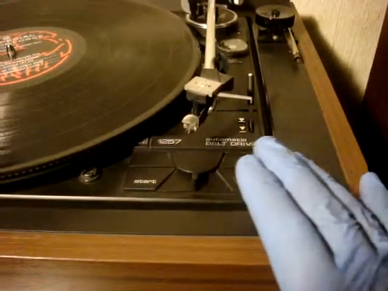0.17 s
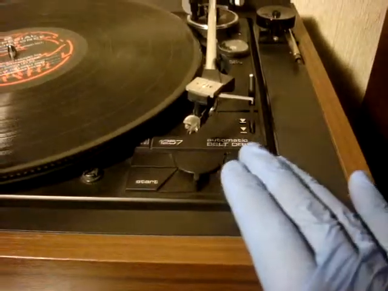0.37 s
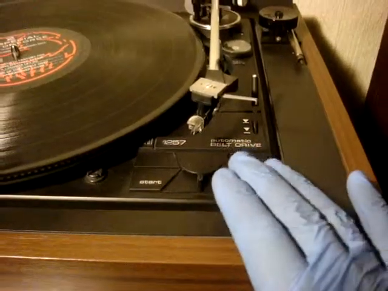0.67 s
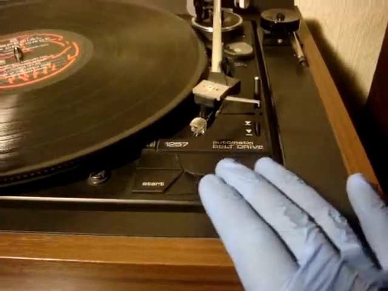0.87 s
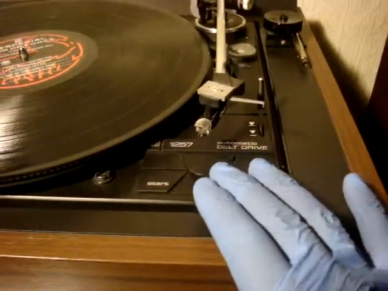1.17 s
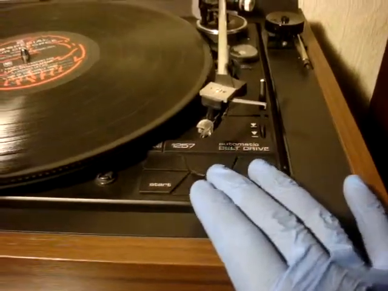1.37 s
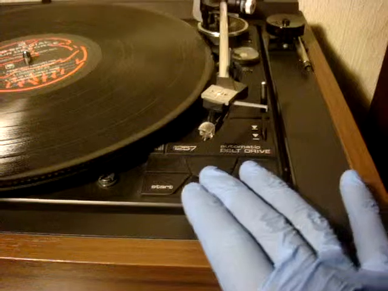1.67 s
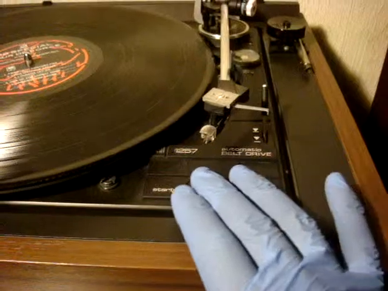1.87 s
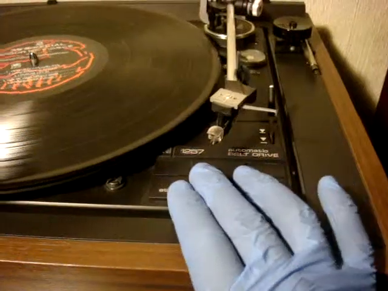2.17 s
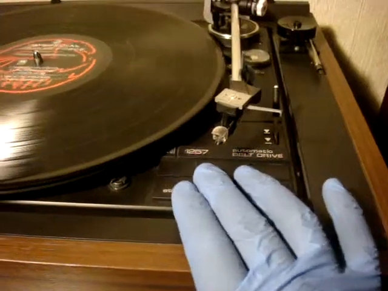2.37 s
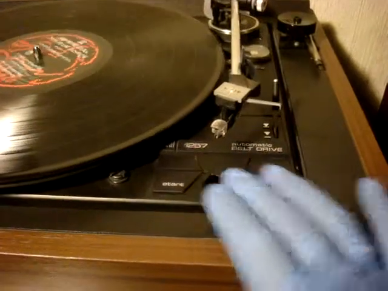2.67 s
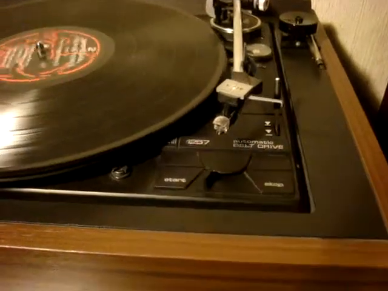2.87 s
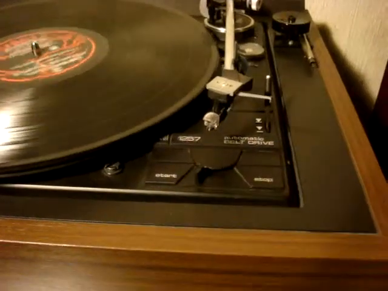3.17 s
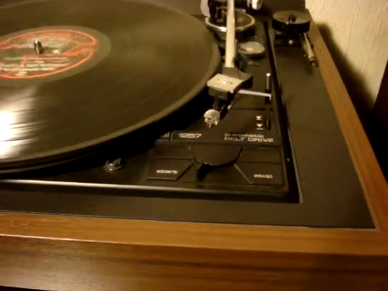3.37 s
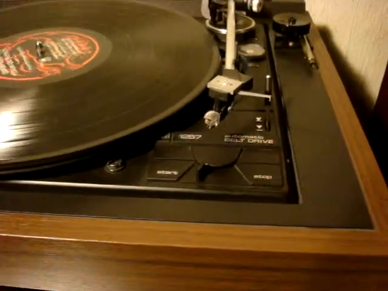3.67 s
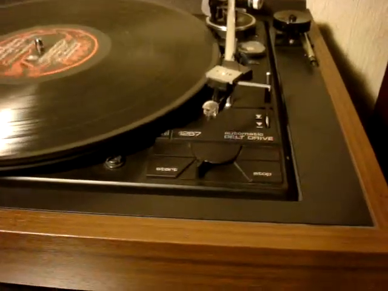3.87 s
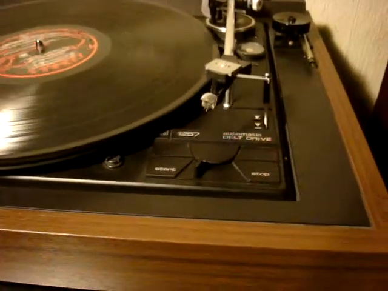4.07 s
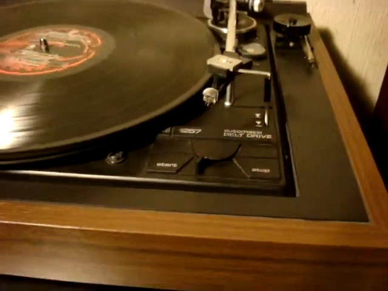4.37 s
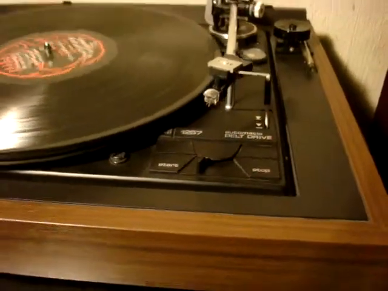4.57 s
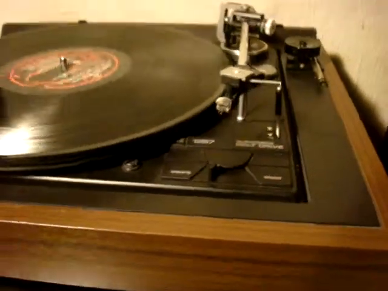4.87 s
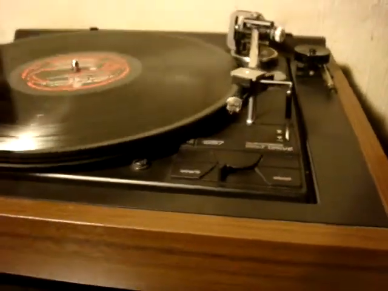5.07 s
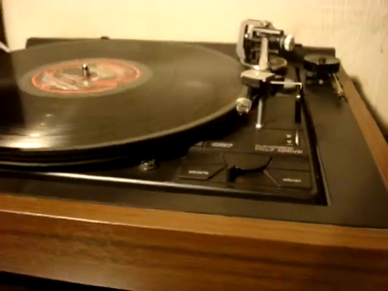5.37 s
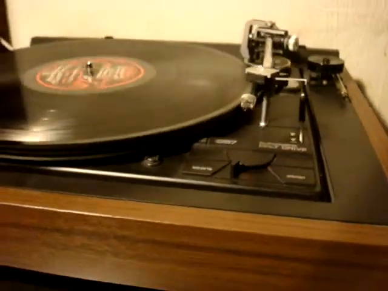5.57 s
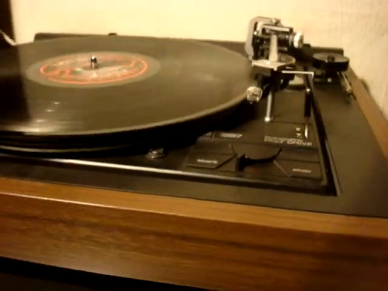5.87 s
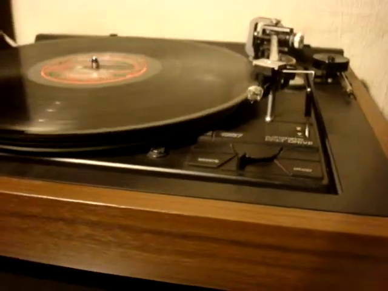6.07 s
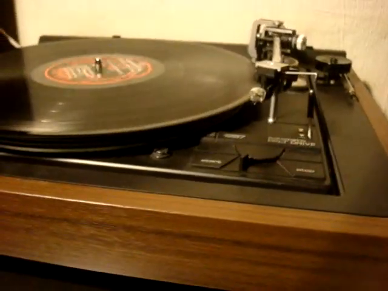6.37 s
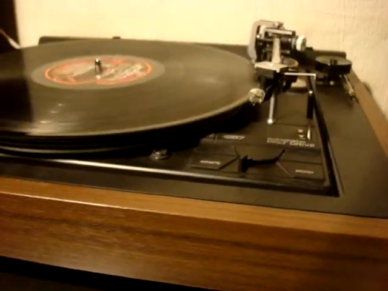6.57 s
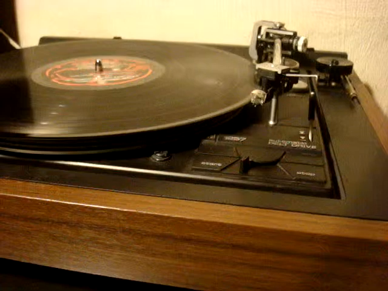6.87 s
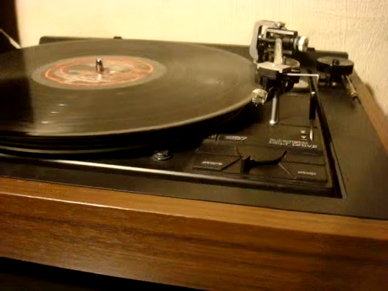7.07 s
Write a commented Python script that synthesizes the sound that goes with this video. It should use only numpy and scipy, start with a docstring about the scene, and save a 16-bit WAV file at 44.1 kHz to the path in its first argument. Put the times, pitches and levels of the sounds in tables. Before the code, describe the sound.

In a quiet room, a soft, steady hiss runs close to an automatic record player. The start lever clicks, and a gloved hand draws back with a faint swish. A spring latch snaps and knocks the deck in a sharp double clack, the loudest moment. Two lighter clicks follow, about a second apart, as the arm lift engages. Each click rings very briefly.

```python
"""A quiet room, close to an automatic record player starting up, in mono.
The start lever clicks and a gloved hand draws back. A spring latch snaps, its linkage knocks the
deck plate, then a small catch trips and the arm lift engages. Each struck part rings briefly with
its own modes inside a short clatter. Under it lies a soft, steady hiss with a few faint tones."""
import sys
import numpy as np
from scipy import signal
from scipy.fft import rfft, irfft
from scipy.io import wavfile

SR = 44100
rng = np.random.default_rng(int(sys.argv[2]) if len(sys.argv) > 2 else 0)


def inscribe(sig):
    """Save sig as 16-bit PCM at rate SR to the path in sys.argv[1].

    A 1-D sig is mono; a 2-D sig holds one channel per row.
    Samples are clipped to [-1, 1] before scaling.
    """
    pcm = np.round(np.clip(np.atleast_2d(sig).T, -1, 1) * 32767)
    wavfile.write(sys.argv[1], SR, pcm.astype(np.int16))


N = 318310
CUT_HZ = 10120

# The cue list. Each row: start in seconds, part struck, level in dB before the tilt,
# brightness tilt in dB per octave.
CLICKS = [ (1.8631, "lever", -37, 4), (1.8805, "lever", -43.5, 2.5), (1.995, "pawl", -49, 3.5),
          (3.069, "trip", -51, -1), (3.1106, "latch", -30, 1.8), (3.122, "latch", -47, 0),
          (3.1525, "plate", -26.5, 0), (3.334, "trip", -49, 3.5), (3.904, "trip", -52, -5),
          (3.9145, "cam", -39.5, 0.9), (5.1428, "catch", -50, -6), (5.1637, "lift", -39.5, 1.5),
          (5.1727, "lift", -44, 2), ]


def mechanism():
    """The start cycle: the parts strike one after another, each on its cue."""
    out = np.zeros(N + SR)
    for start_s, part, level_db, tilt_db in CLICKS:
        sound = click(part, level_db, tilt_db)
        start = int(start_s * SR)
        out[start:start + len(sound)] += sound
    return out[:N]


# The clear ring of each part. Each row: pitch in Hz, relative level in dB, seconds to fall 60 dB.
LATCH_MODES = [(531, -5.5, 0.13), (1010, -3.5, 0.06), (1640, -1, 0.081), (2436, -4.5, 0.034),
               (3040, -2, 0.034), (3190, -6, .035), (3480, -4, 0.035), (3806, -0.5, 0.033),
               (4010, -3, 0.03), (4340, -5, .035), (4662, -2, 0.027), (5114, -13, 0.031),
               (5340, -11.5, 0.038), (6060, -13, 0.033), (6440, -4.5, 0.035), (7138, -5.5, 0.033),
               (8290, -11, 0.02), (9300, -8, .024)]
PLATE_MODES = [(353, -25, 0.12), (795, -13.5, 0.05), (922, -2, 0.072), (970, -10, 0.1), (1077, -3, 0.057),
               (1118, 3, 0.093), (1337, -10.5, 0.097), (1588, -15, 0.16), (1642, -14, 0.098),
               (1749, -3, 0.055), (2540, -8, .036), (2895, -7.5, 0.036), (2990, -5, 0.044),
               (3160, -7.5, 0.042), (3950, -11, 0.042), (4610, -19, .042), (6067, -19, .03)]
LEVER_MODES = [(1030, -9, 0.1), (1436, 6.5, 0.034), (2030, -4.5, .03), (2520, 1, 0.022), (2778, -6, 0.045),
               (3280, -10, 0.05)]
CAM_MODES = [(970, 1.5, 0.12), (1157, -2, 0.08), (1236, -2, 0.066), (1450, 1, .055), (1574, 0, 0.05),
             (1798, -4, 0.055), (1976, -6, .05)]
LIFT_MODES = [(590, 0, .07), (970, -3, .05), (1187, 4, .065), (2010, -2, 0.06), (3330, -9, .05),
              (3553, -11, 0.05), (4040, -1, .035), (4290, 4, 0.036), (4900, 3, 0.032), (5420, -1, 0.034),
              (5950, -7, 0.031), (6750, -3, 0.026)]
PAWL_MODES = [(2910, 0, .035), (3520, 5, 0.044), (4300, 1, .035), (4730, -5, .03)]
TRIP_MODES = [(1610, -1, .06), (2070, 2, .05), (2350, 0, .05), (2600, 2, .045), (4370, -6, 0.055),
              (5400, -7, .04)]
CATCH_MODES = [(4030, 0, 0.041), (4170, 1, 0.041)]
# The EQ of the clatter, a blur of short, overlapping modes.
# Each row: frequency in Hz, relative level in dB.
LATCH_COLOUR = [(20, -11), (60, -6), (150, -14), (300, -1), (800, -8.5), (2000, -1.5), (3800, 1.5),
                (5500, -4.5), (8000, -6.5), (10000, -6.5)]
PLATE_COLOUR = [(100, -32), (600, -12), (800, -1), (1050, 3), (1500, 3.5), (2100, -3.5), (3000, 0),
                (4500, -3), (5500, -14), (8000, -17), (10000, -20)]
LEVER_COLOUR = [(100, -22), (700, 1), (1400, 1.5), (2700, 2), (4200, -10), (6000, -20.5), (8300, -16.5),
                (10000, -23)]
CAM_COLOUR = [(100, -24), (600, -7), (1500, 1), (2500, -6), (4500, -17), (7000, -24), (8500, -9),
              (10000, -16)]
LIFT_COLOUR = [(100, -26), (600, -3), (2000, 0), (2700, -0.5), (4400, -1), (6500, -5), (8000, -10),
               (10000, -15)]
TRIP_COLOUR = [(100, -22), (700, -3), (2400, 3), (3300, -4), (5000, -10), (7000, -20), (10000, -22)]
# The voice of each part, by name. Each row: modes, clatter EQ, clatter against the ring in dB,
# seconds for the clatter to fall 60 dB, attack in seconds, contact in seconds for a medium blow.
PARTS = { "latch": (LATCH_MODES, LATCH_COLOUR, 1.5, 0.024, 0.0018, 0.0053),
         "plate": (PLATE_MODES, PLATE_COLOUR, -7, 0.055, 0.0018, 0.005),
         "lever": (LEVER_MODES, LEVER_COLOUR, -2.7, 0.051, .0027, .006),
         "cam": (CAM_MODES, CAM_COLOUR, -2.5, 0.043, 0.0028, .008),
         "lift": (LIFT_MODES, LIFT_COLOUR, 0.85, 0.04, .004, .0072),
         "pawl": (PAWL_MODES, LEVER_COLOUR, 0, .055, 0.0034, .0063),
         "trip": (TRIP_MODES, TRIP_COLOUR, 1, .055, .003, 0.0065),
         "catch": (CATCH_MODES, LIFT_COLOUR, -8, 0.027, .0031, 0.0081), }


def click(part, level_db, tilt_db):
    """One blow on a part: the force builds, the surfaces rub and chatter, then it rings out."""
    modes, colour, clatter_db, clatter_t60, attack_s, medium_contact_s = PARTS[part]
    medium_blow_db, contact_doubling_db = -34.5, 13.5
    t = np.arange(SR // 4) / SR
    # a harder blow stays in contact longer, holding off the decay
    contact_s = medium_contact_s * 2 ** ((level_db - medium_blow_db) / contact_doubling_db)
    since_release = np.maximum(t - contact_s, 0)
    hz, mode_db, ring_t60 = np.transpose(modes)[:, :, None]
    weight = undb(mode_db) / np.sqrt(np.sum(undb(mode_db) ** 2) / 2)
    ring = np.sum(weight * np.sin(2 * np.pi * hz * t) * fade(since_release, ring_t60), axis=0)
    clatter = undb(clatter_db) * noise(colour, len(t)) * fade(since_release, clatter_t60)
    attack = np.minimum(t / attack_s, 1) ** 2
    blow = (ring + clatter) * attack
    # a harder contact is brighter: the tilt pivots at 2500 Hz and levels off below 400 Hz
    octaves = np.log2(np.maximum(bins(len(t)), 400) / 2500)
    return undb(level_db) * irfft(rfft(blow) * undb(tilt_db * octaves), len(t))


def glove_rustle(peak_s=2.94, width_s=0.03, level_db=-59.0):
    """A soft, airy swell of noise as the gloved hand draws back."""
    t = np.arange(N) / SR
    colour = [(500, -24), (3000, -2), (5500, 5), (10000, -6)]
    swell = np.exp(-((t - peak_s) / width_s) ** 2 / 2)
    return undb(level_db) * swell * noise(colour, N)


# The dark EQ of the room's tail. Each row: frequency in Hz, relative level in dB.
ROOM_COLOUR = [(100, 13), (1100, 12), (2500, 13), (10000, -48)]


def room(sound, t60, wet_db, predelay_s=0.0073):
    """Reflections in a small furnished room add a short, duller tail."""
    t = np.arange(SR // 2) / SR
    tail = noise(ROOM_COLOUR, len(t)) * fade(t, t60) * (t > predelay_s)
    tail /= np.sqrt(np.sum(tail ** 2))
    return sound + undb(wet_db) * signal.fftconvolve(sound, tail)[:N]


# The EQ of the hiss bed. Each row: frequency in Hz, relative level in dB.
HISS_COLOUR = [(15, -53), (25, -24), (90, -12.5), (148, -5.5), (181, -3.5), (284, -0.5), (440, 0),
               (546, -0.5), (651, -1), (836, -2.5), (1050, -3.5), (1600, -7), (2010, -7.5), (2170, -8.5),
               (2720, -10.5), (8180, -17.5), (10000, -20), (13000, -72), (22000, -120)]
# Thin tones in the bed. Each row: centre in Hz, bandwidth in Hz, level in dB.
HISS_TONES = [(1983, 60, -72), (3100, 68, -77), (3850, 120, -78.5), (7870, 89, -79.5)]


def hiss(bed_db=-53.5):
    """An even bed of hiss, with narrow bands of noise heard as faint, wavering tones."""
    out = undb(bed_db) * noise(HISS_COLOUR, N)
    for hz, width_hz, level_db in HISS_TONES:
        resonance = 1 / (1 + ((bins(N) - hz) / width_hz * 2) ** 2)
        tone = irfft(rfft(rng.standard_normal(N)) * resonance, N)
        out += undb(level_db) * unit(tone)
    return out


def noise(colour, size):
    """Noise of rms 1, shaped by an EQ of (Hz, dB) points and silent above CUT_HZ."""
    hz, db = np.transpose(colour)
    f = bins(size)
    gain = undb(np.interp(np.log(f), np.log(hz), db)) * (f < CUT_HZ)
    return unit(irfft(rfft(rng.standard_normal(size)) * gain, size))


def fade(t, t60):
    """Free decay, falling 60 dB in t60 seconds."""
    return np.exp(-np.log(1000) * t / t60)


def undb(db):
    """Decibels to gain."""
    return 10 ** (np.asarray(db) / 20)


def unit(x):
    """Scale to rms 1."""
    return x / np.sqrt(np.mean(x ** 2))


def bins(size):
    """Frequencies in the spectrum of a sound this many samples long, floored at 1 Hz."""
    return np.maximum(np.fft.rfftfreq(size, 1 / SR), 1)


def scene():
    """Mechanism and glove in the room, over the hiss, the same in both channels."""
    mono = room(mechanism() + glove_rustle(), t60=0.41, wet_db=-27) + hiss()
    return np.array([mono, mono])


def record(dry):
    """A steep low-pass takes off the top end."""
    lowpass = signal.ellip(10, .1, 70, CUT_HZ, fs=SR, output="sos")
    return signal.sosfilt(lowpass, dry)


dry = scene()
out = record(dry)
inscribe(out)
```